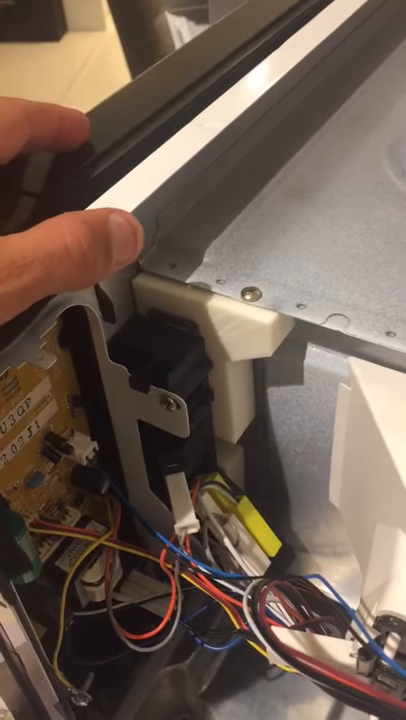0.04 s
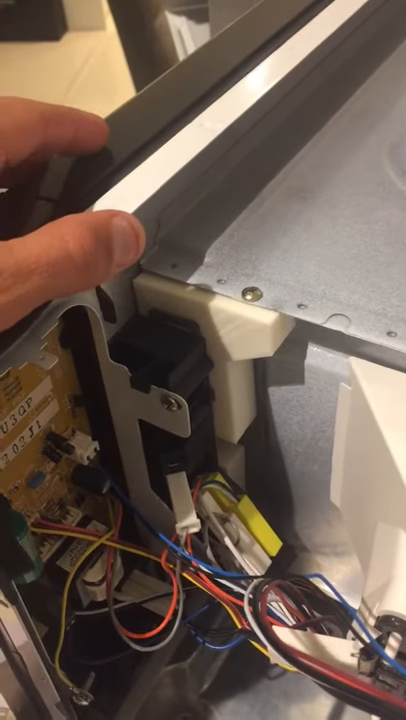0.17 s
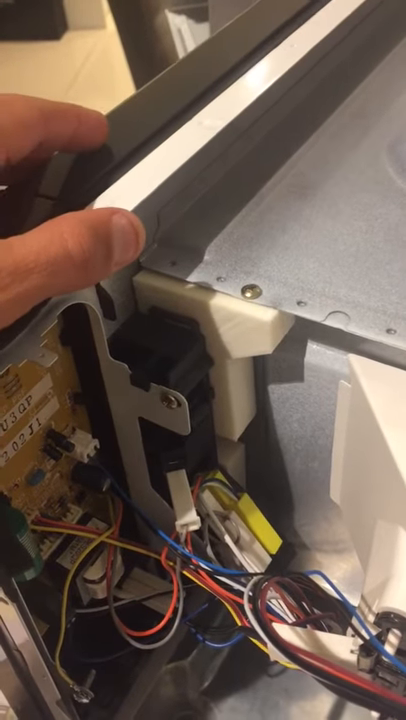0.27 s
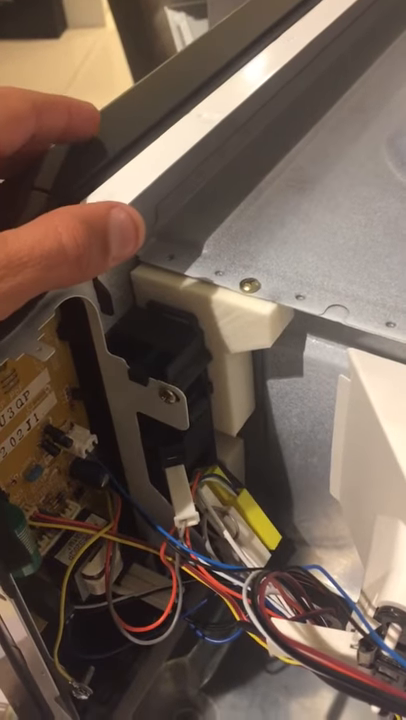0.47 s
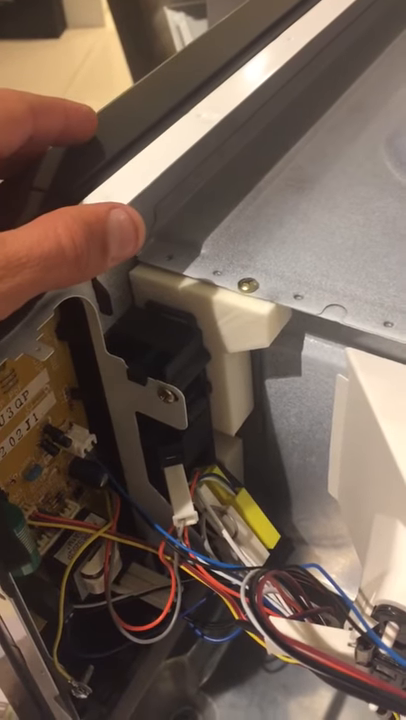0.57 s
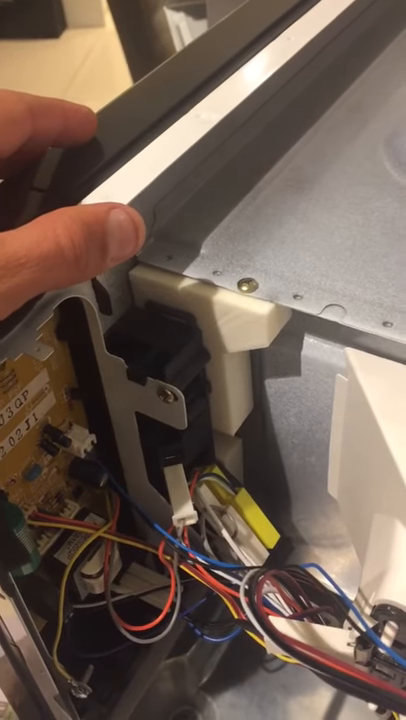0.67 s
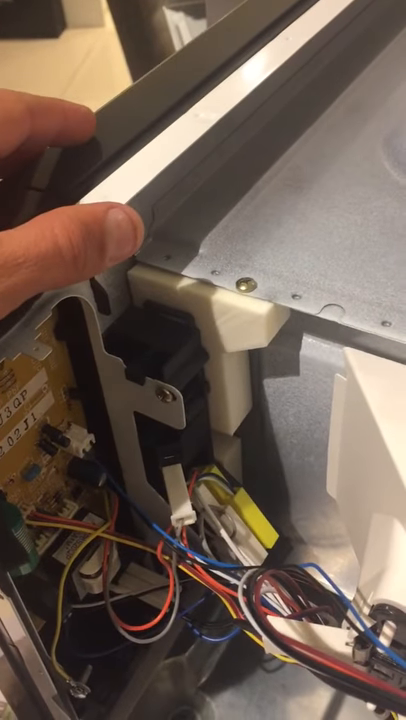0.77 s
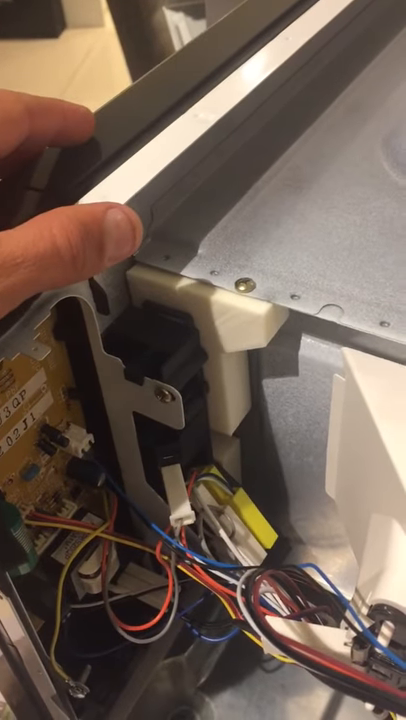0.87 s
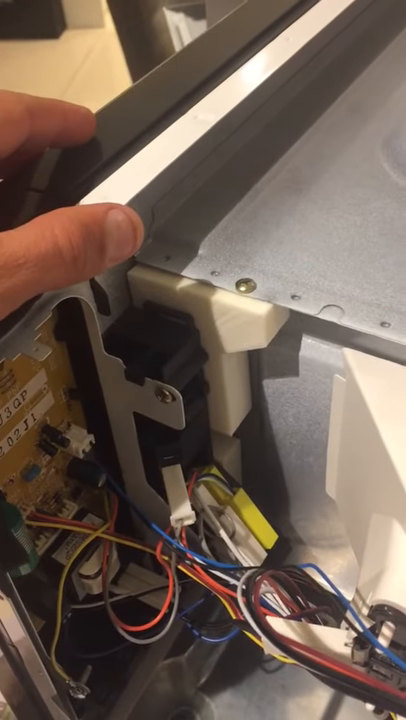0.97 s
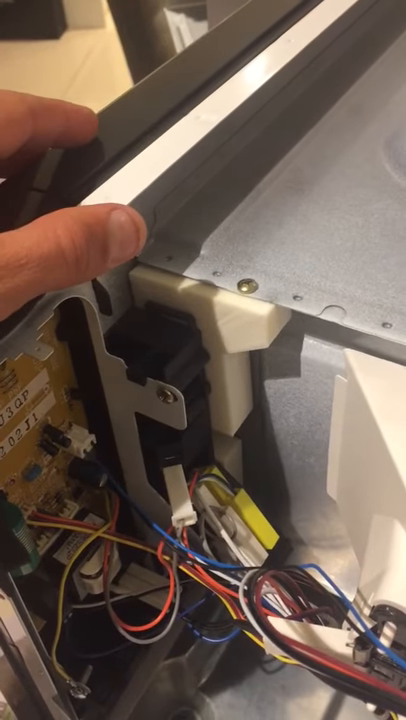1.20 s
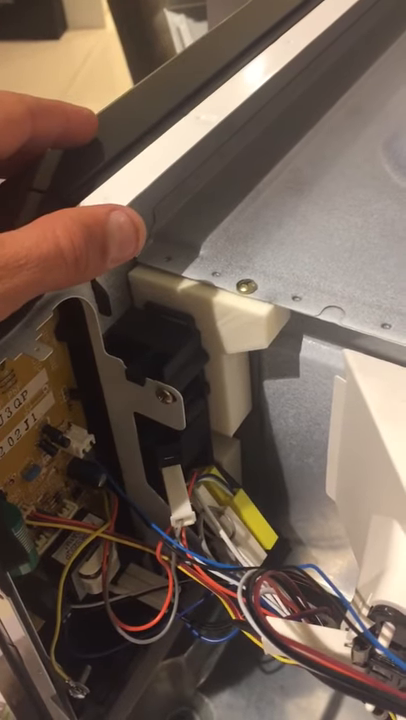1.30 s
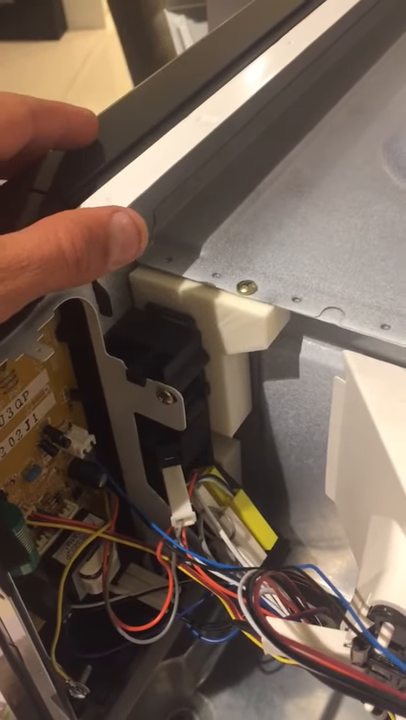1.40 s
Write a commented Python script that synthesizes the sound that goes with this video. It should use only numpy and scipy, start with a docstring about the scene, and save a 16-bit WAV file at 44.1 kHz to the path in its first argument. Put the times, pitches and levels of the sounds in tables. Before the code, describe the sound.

A microwave oven door slams shut with one sharp, clanging bang in a small room.

```python
"""In a small room, close to the microphone, a microwave oven with its cover off is pushed shut.
The door swings with a soft rub, the latch hooks click over their ramps and the door slams home.
The steel panels clang, the cabinet booms and the room rings on over a faint hiss.
The bang overloads the sound, and an automatic volume control turns it down for a moment."""
import sys
import numpy as np
from scipy import signal
from scipy.fft import irfft
from scipy.io import wavfile
from scipy.ndimage import minimum_filter1d

SR = 44100
rng = np.random.default_rng(int(sys.argv[2]) if len(sys.argv) > 2 else 0)


def store_wav(level_fs):
    """Save 16-bit WAV to argv[1]."""
    pcm = np.round(np.clip(np.atleast_2d(level_fs), -1, 1) * 32767)
    wavfile.write(sys.argv[1], SR, pcm.T.astype(np.int16))


N = 63945
T = np.arange(N) / SR

# Hits of the latch and door. A "ring time" is how long a sound takes to fade by 60 dB.
# (time [s], level [dB], brightness [dB per octave], treble edge [Hz], ring time [x], panel level [dB])
DOOR_HITS = [(0.1914, -24, 1, 6016, 0.27, -13), (.2000, -25, 0, 17000, 0.38, -14),
             (.2025, -18.5, -1.5, 14000, 0.3, -16), (.2087, -14.5, -3, 18000, .4, -16),
             (.2102, -4.5, 0.76, 13000, 0.49, 2.5), (0.2175, -9, -0.6, 18000, 1.076, -12)]
# clatter of plastic and steel (frequency [Hz], relative level [dB])
CLATTER_SPECTRUM = [(30, -28.5), (90, -20.5), (250, -6.5), (520, -7.5), (800, -4.5), (1500, -3), (2200, -2),
                    (3400, -2.5), (4300, -6.5), (5000, -11.5), (8000, -11), (11000, -15), (17000, -13.5)]
# how long the clatter lasts (frequency [Hz], base ring time [s])
CLATTER_RING_TIMES = [(100, 0.067), (1200, 0.22), (3500, .11), (8000, .1), (16000, .085)]
# natural tones of the steel panels (frequency [Hz], level [dB], base ring time [s])
PANEL_TONES = [(438, -21, .4), (648.4, -5, .18), (864.5, -13, 0.31), (950, -20.5, 0.34),
               (1259, -14.5, 0.13), (1307, -14, .2), (1411, -15, 0.22), (1531, -16, 0.25), (1713, -17, .26),
               (1822, -14, 0.28), (2051, -20.5, 0.25), (3020, -20, 0.29), (3274, -17, 0.27),
               (3515, -12, 0.14)]
# pushes on the cabinet: the hand nudges, the door lands and bounces, the hand shifts (time [s], level [dB])
CABINET_PUSHES = [(0.117, -43.5), (.2192, 2.5), (.2290, -1.5), (0.2641, -15.5), (0.3627, -16.5),
                  (1.369, -64.5)]
# natural tones of the cabinet (frequency [Hz], level [dB], ring time [s])
CABINET_TONES = [(40.29, -6.5, .13), (58.38, -14, 0.31), (108, -16, .22), (122.6, -13.5, .18),
                 (137.17, -12, 0.57), (147.8, -11, 0.17), (177.6, -3, 0.07), (194.7, -17, 0.19),
                 (221, -16.5, .15), (235, -15, 0.27), (290.6, -19, 0.22), (349, -22, 0.067)]
# rub of the swinging door (frequency [Hz], relative level [dB])
RUB_SPECTRUM = [(30, -7.5), (80, -8.5), (135, 5), (260, -10.5), (600, -6.5), (1200, -7.5), (2500, -15.5),
                (4500, -25), (7000, -29), (10000, -33), (17000, -44.5)]
# pitches that the sliding latch hooks bring out (frequency [Hz], width [Hz], boost [dB])
HOOK_PEAKS = [(964, 81, 10.5), (1285.4, 60, 8.5), (2440, 90, 7), (3530, 110, 9), (4340, 120, 6.5),
              (6430, 140, 11), (8400, 140, 9.5), (9200, 140, 15), (12000, 200, 10)]
# how long the room echoes (frequency [Hz], ring time [s])
ECHO_RING_TIMES = [(60, .5), (200, 0.92), (500, 0.87), (1500, 0.8074), (3000, 0.7011), (6000, 0.6058),
                   (10000, 0.3123), (16000, 0.36)]
# how strongly the room echoes (frequency [Hz], level [dB])
ECHO_SPECTRUM = [(50, -16), (150, -9.5), (400, -4.5), (1500, -3.7), (3500, -10), (8000, -8.5),
                 (12000, -14.5), (16000, -15)]
# tones that linger between the walls and in the steel (frequency [Hz], level [dB], ring time [s])
LINGERING_TONES = [(131, -39.5, 1.3), (159, -23, 1.14), (213, -34, 1.3), (225.3, -21, 1.1), (248, -30, .88),
                   (272, -38, 1.55), (366, -38.5, 1.1), (684, -50, .85), (797, -46, .85), (1070, -46, 1.4),
                   (1670, -38, .75)]
# quiet room noise and microphone hiss (frequency [Hz], relative level [dB])
HISS_SPECTRUM = [(15, -29.5), (30, -14.5), (100, -2.5), (180, -12), (270, -10), (450, -21), (1000, -23),
                 (2000, -24), (6000, -28.5), (17000, -34.5)]


def door_hits(attack_s=0.00041):
    """Each hit of the latch or door makes a burst of clatter and sets the steel panels ringing."""
    clatter, panels = np.zeros((2, N))
    for start_s, db, brightness, edge_hz, stretch, panel_db in DOOR_HITS:
        blow = amp(db) * fade_in(attack_s)
        burst = noise(CLATTER_SPECTRUM,
                      lambda hz: brightness * np.log2(hz + 1) - 10 * np.log10(1 + (hz / edge_hz) ** 4))
        ring_times = [(hz, ring_s * stretch) for hz, ring_s in CLATTER_RING_TIMES]
        clatter += delayed(blow * die_away(burst, ring_times), start_s)
        panels += delayed(blow * amp(panel_db) * ring(PANEL_TONES, stretch), start_s)
    return clatter, panels


def cabinet_boom(attack_s=0.0018, bass_cut_hz=84):
    """The whole box booms when pushed; its deepest bass is turned down."""
    boom = fade_in(attack_s) * ring(CABINET_TONES, sign=1)
    bass_cut = signal.butter(2, bass_cut_hz, "high", fs=SR, output="sos")
    boom = signal.sosfilt(bass_cut, boom)
    return sum(delayed(amp(db) * boom, start_s) for start_s, db in CABINET_PUSHES)


def latch_rub(start_s=0.09, end_s=0.26, swell_s=0.087, fade_s=0.01, level_db=-49):
    """The latch hooks scrape softly over their ramps as the door swings in."""
    swell = np.clip((T - start_s) / swell_s, 0, 1) * np.clip((end_s - T) / fade_s, 0, 1)
    scrape = noise(RUB_SPECTRUM,
                   lambda hz: sum(db / (1 + (2 * (hz - f) / width) ** 2) for f, width, db in HOOK_PEAKS))
    return amp(level_db) * swell * scrape


def room_ring(sound, echo_rise_s=0.0062, tone_rise_s=0.08):
    """The walls return an echo that dulls as it fades, and the slam sets off lingering tones."""
    echo = die_away(rng.standard_normal(N), ECHO_RING_TIMES, ECHO_SPECTRUM)
    echo = echo * fade_in(echo_rise_s) / np.sqrt(SR / 20)
    slam_s = max(CABINET_PUSHES, key=lambda push: push[1])[0]  # time of the hardest push
    tones = fade_in(tone_rise_s) * ring(LINGERING_TONES)
    return signal.fftconvolve(sound, echo)[:N] + delayed(tones, slam_s)


def background_hiss(level_db=-70.5):
    """The quiet room and the microphone add a faint, steady noise."""
    return amp(level_db) * noise(HISS_SPECTRUM)


def amp(db):
    """Turns decibels into a number to multiply by."""
    return 10 ** (np.asarray(db) / 20)


def curve(points, hz):
    """Joins (frequency, value) points with lines, giving each octave equal space."""
    point_hz, values = np.transpose(points)
    return np.interp(np.log(hz + 1), np.log(point_hz + 1), values)


def delayed(sound, start_s):
    """Makes a sound start later."""
    return np.concatenate([np.zeros(round(start_s * SR)), sound])[:N]


def noise(spectrum, extra_db=lambda hz: 0):
    """Noise of strength 1, shaped by a spectrum and any extra boost or cut."""
    hz = np.fft.rfftfreq(N, 1 / SR)
    phases = np.exp(2j * np.pi * rng.random(len(hz)))
    sound = irfft(phases * amp(curve(spectrum, hz) + extra_db(hz)), N)
    return sound / sound.std()


def die_away(sound, ring_times, spectrum=None):
    """Lets each frequency fade at its own speed; a spectrum, if given, shapes the starting levels."""
    hz, t, bands = signal.stft(sound, SR, nperseg=256)
    db = -60 * t / curve(ring_times, hz)[:, None]
    if spectrum:
        db += curve(spectrum, hz)[:, None]
    return signal.istft(bands * amp(db), SR, nperseg=256)[1][:N]


def ring(tones, stretch=1, sign=-1):
    """Fading tones of something struck; with sign -1, neighbours swing in opposite directions."""
    return sum(sign ** k * amp(db - 60 * T / (ring_s * stretch)) * np.sin(2 * np.pi * hz * T)
               for k, (hz, db, ring_s) in enumerate(tones))


def fade_in(rise_s):
    """A smooth climb from silence to full level."""
    return 1 - np.exp(-T / rise_s)


def scene():
    """The door closes and the room answers."""
    clatter, panels = door_hits()
    door = latch_rub() + clatter
    body = panels + cabinet_boom()
    # the panels and box are close to the microphone, so little of them comes back from the room
    room = room_ring(door + amp(-10) * body)
    return (door + body + room + background_hiss())[None]


def record(dry, threshold_db=-15.5, ratio=2, react_s=0.016, hold_s=0.12, recover_db_per_s=55.5):
    """The volume drops at the bang, waits and comes back; peaks are squashed and the top treble is cut."""
    drive_db, clip_hardness, top_hz = 2, 3.6, 17300
    memory = np.exp(-1 / (react_s * SR))
    smoother = [1 - memory], [1, -memory]
    level_db = 10 * np.log10(signal.lfilter(*smoother, dry[0] ** 2) + 1e-12)
    half_hold = round(hold_s * SR / 2)
    # hold the loudest recent level, then let it sink at a steady speed
    held_db = -minimum_filter1d(-level_db, 2 * half_hold + 1, origin=half_hold, mode="nearest")
    fall_db = T * recover_db_per_s
    sinking_db = np.maximum.accumulate(held_db + fall_db) - fall_db
    excess_db = np.maximum(sinking_db - threshold_db, 0)
    dip_db = signal.lfilter(*smoother, excess_db * (1 - 1 / ratio))
    driven = dry * amp(drive_db - dip_db)
    squashed = driven / (1 + abs(driven) ** clip_hardness) ** (1 / clip_hardness)
    treble_cut = signal.firwin(401, top_hz, window=("kaiser", 8), fs=SR)
    return signal.oaconvolve(squashed, treble_cut[None], "same")


dry = scene()
out = record(dry)
store_wav(out)
```